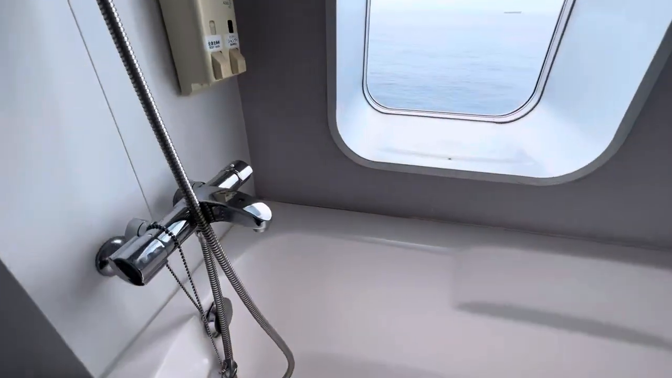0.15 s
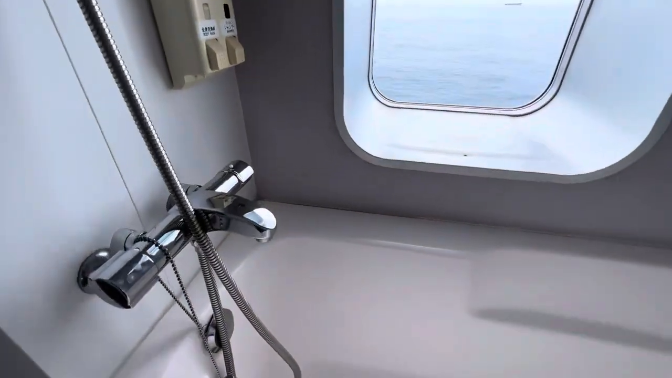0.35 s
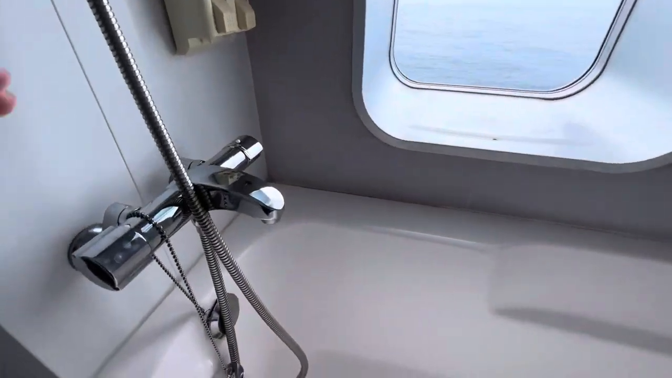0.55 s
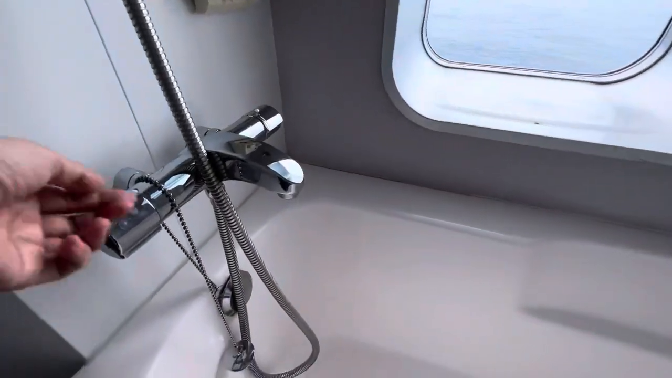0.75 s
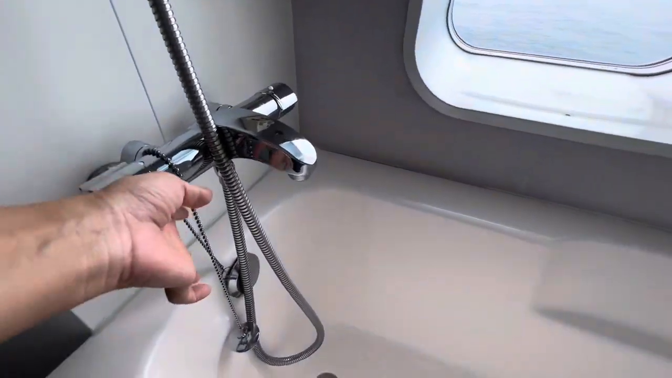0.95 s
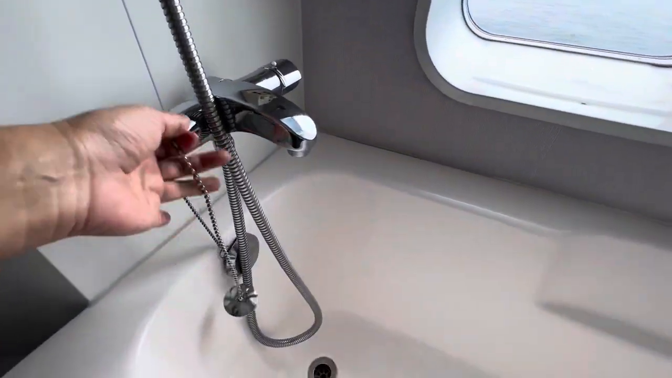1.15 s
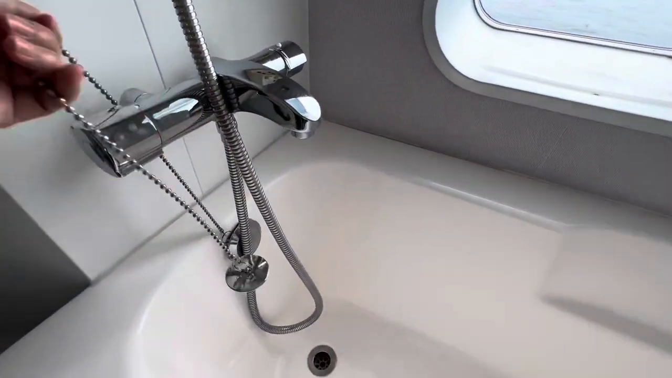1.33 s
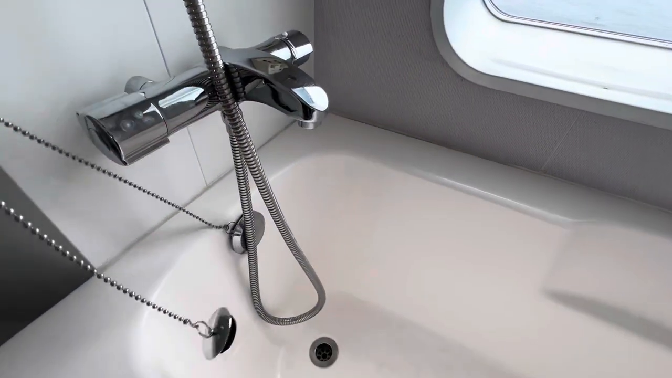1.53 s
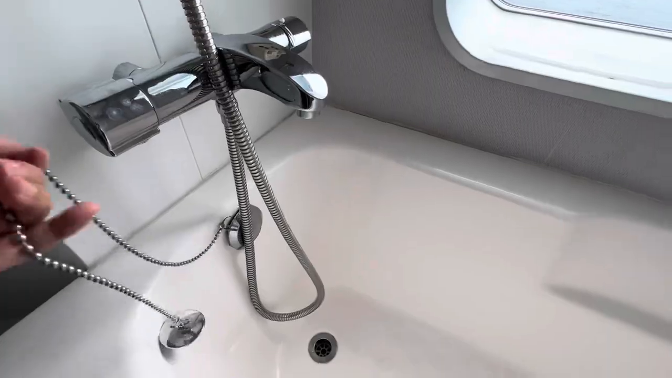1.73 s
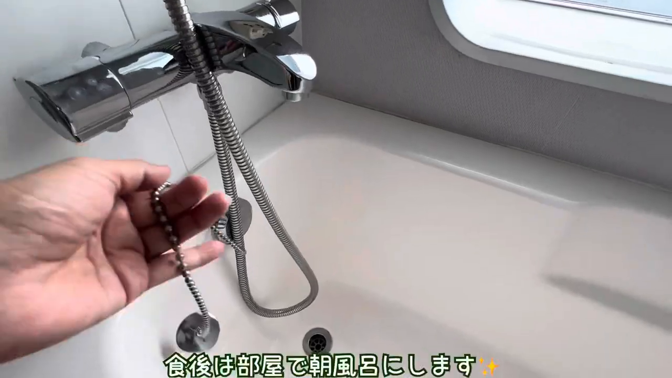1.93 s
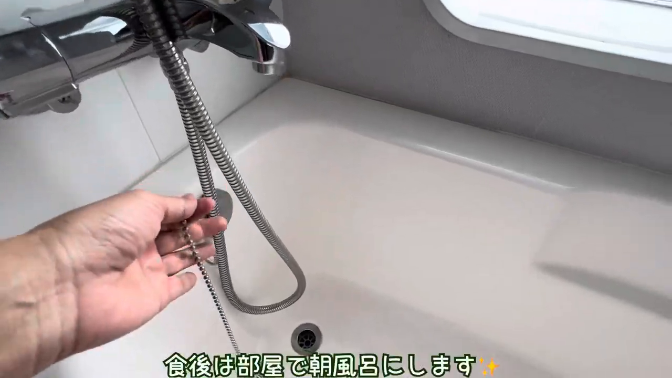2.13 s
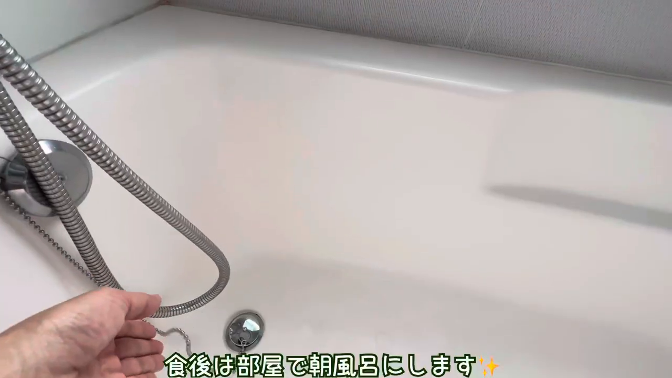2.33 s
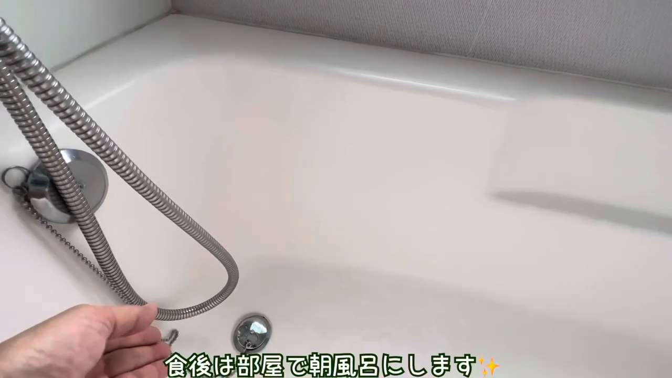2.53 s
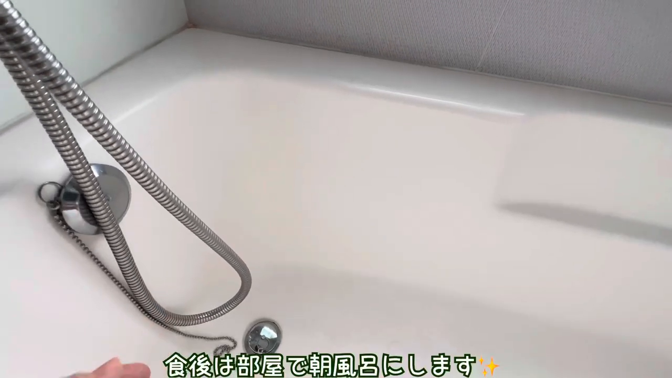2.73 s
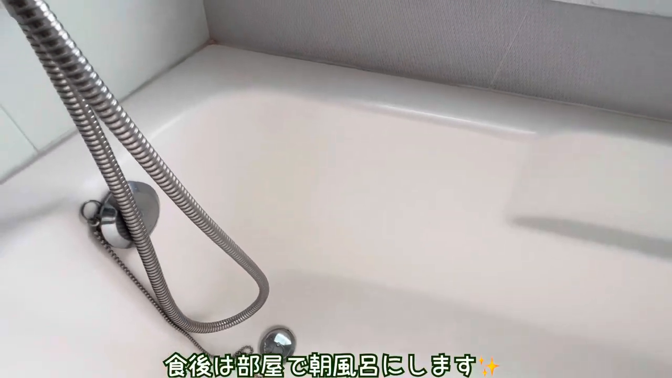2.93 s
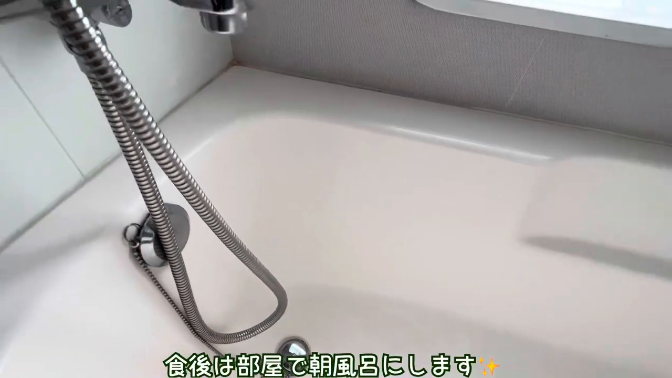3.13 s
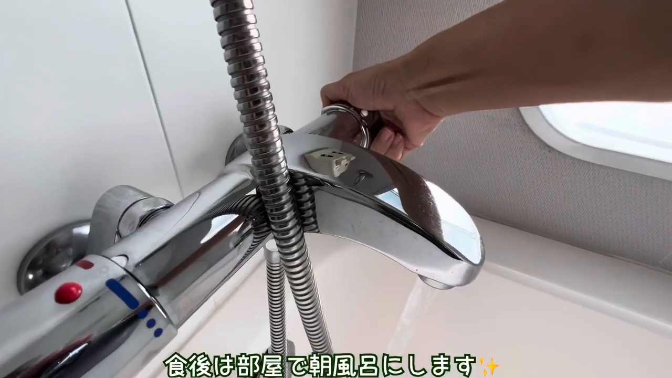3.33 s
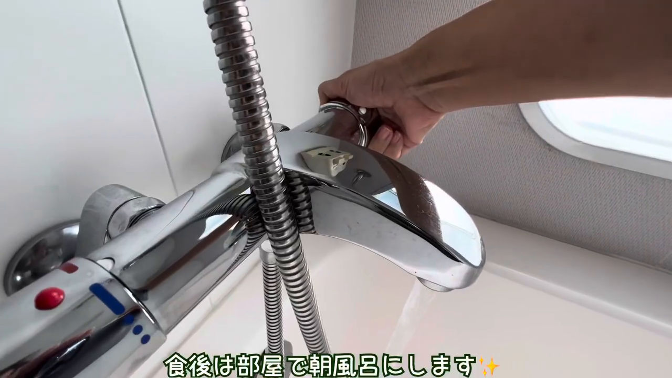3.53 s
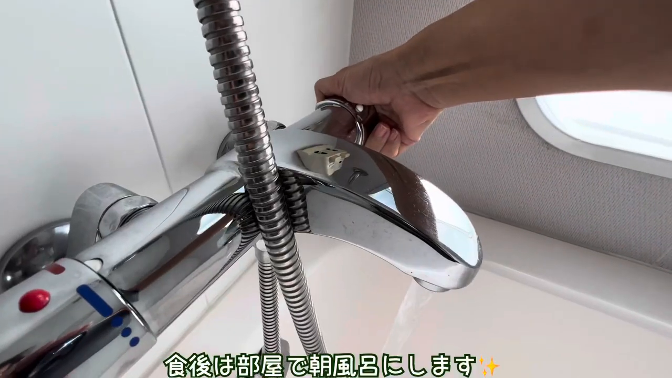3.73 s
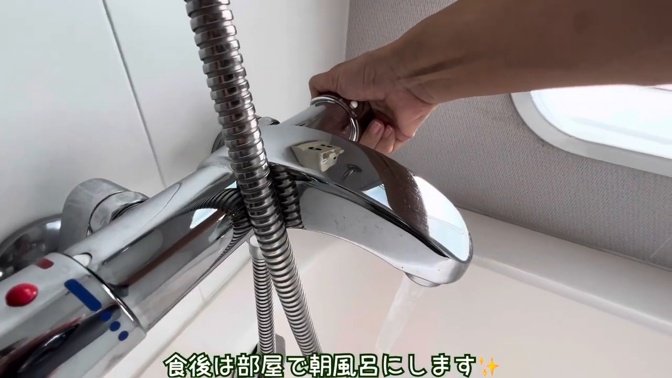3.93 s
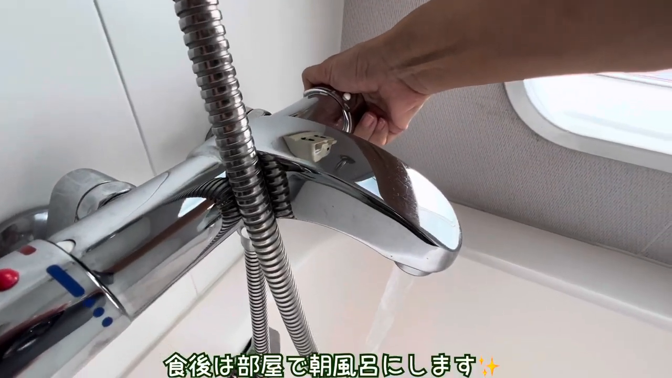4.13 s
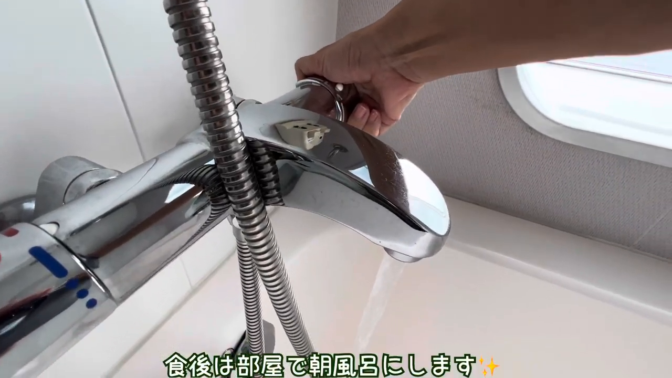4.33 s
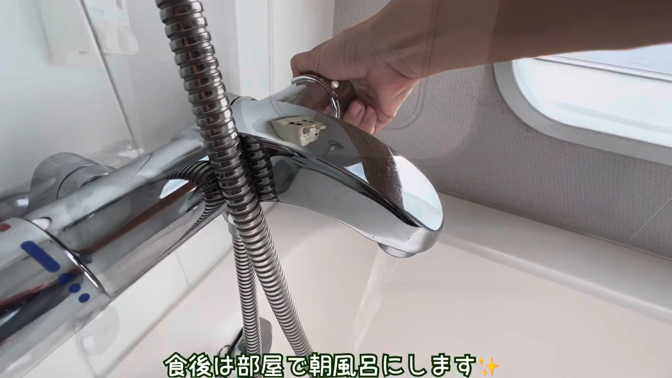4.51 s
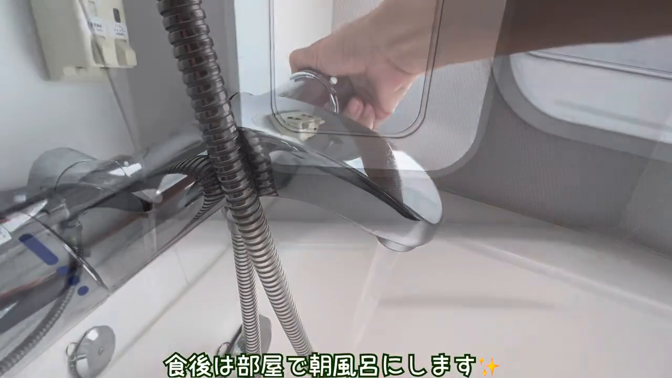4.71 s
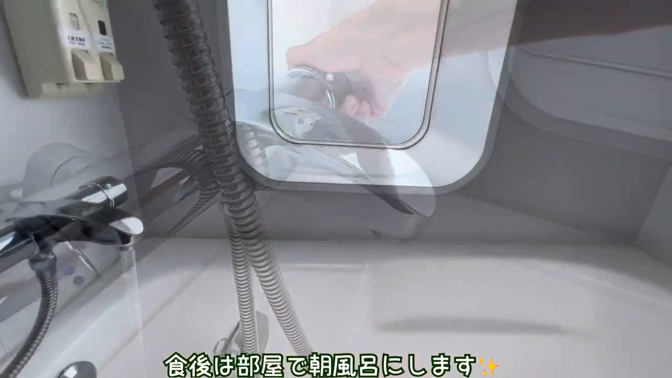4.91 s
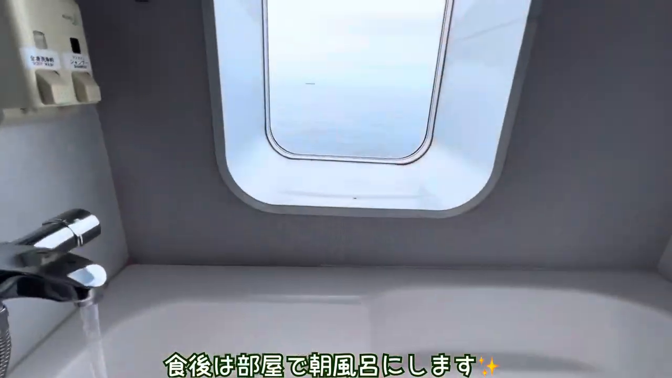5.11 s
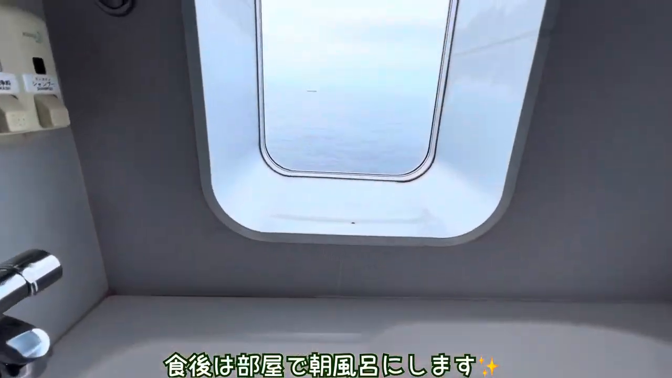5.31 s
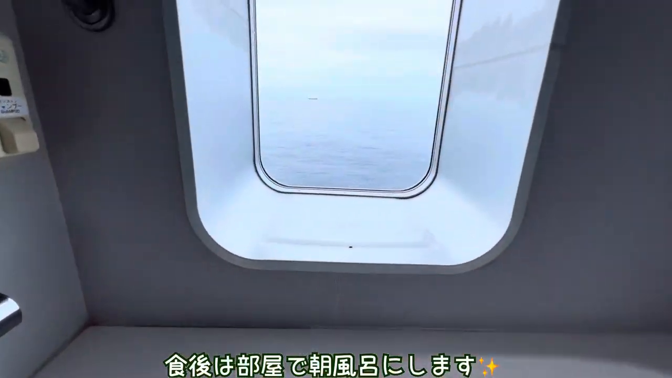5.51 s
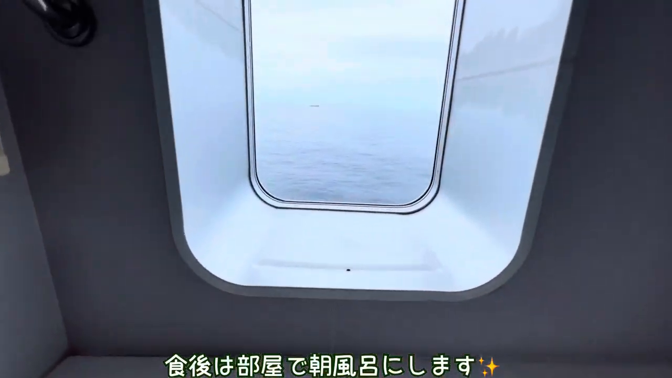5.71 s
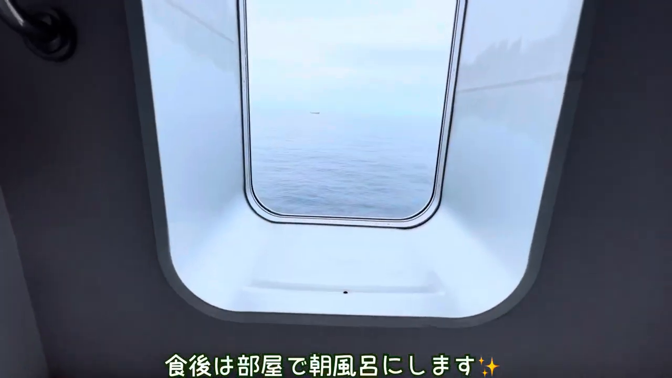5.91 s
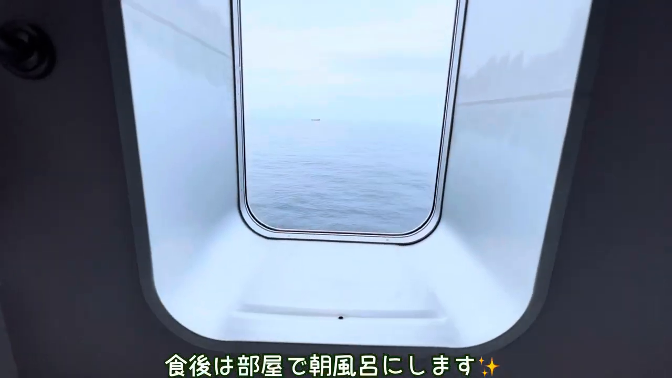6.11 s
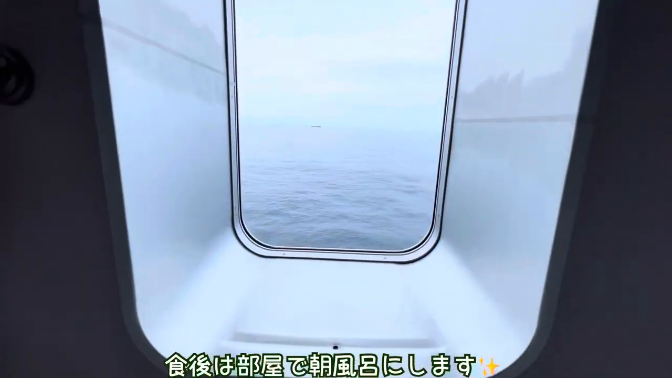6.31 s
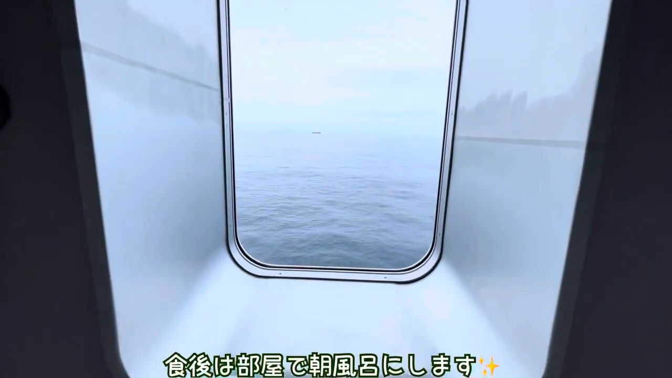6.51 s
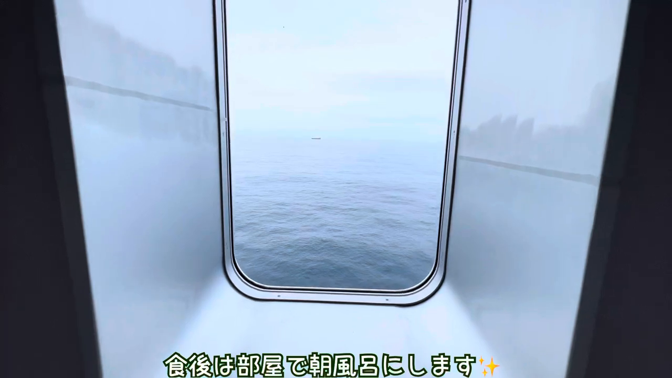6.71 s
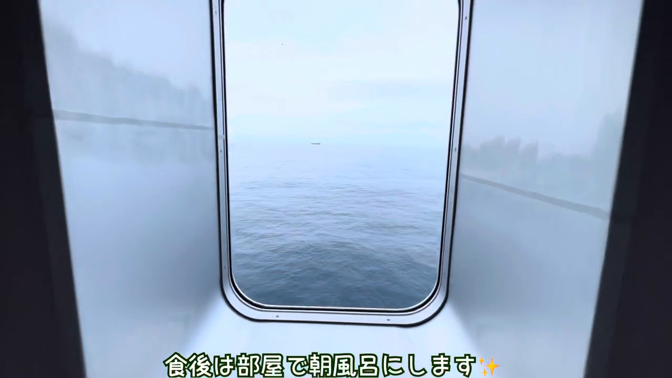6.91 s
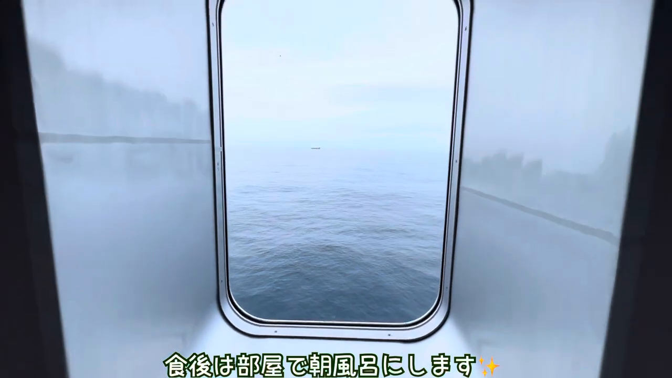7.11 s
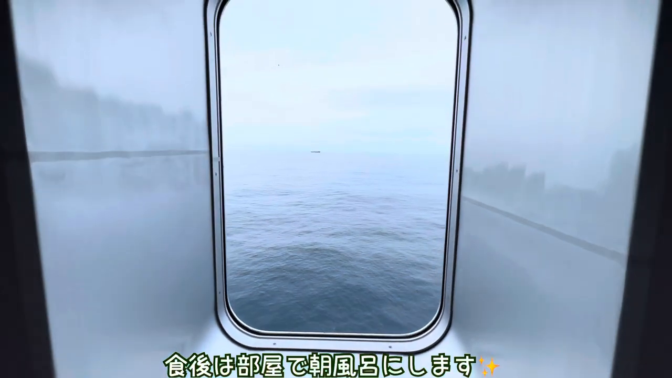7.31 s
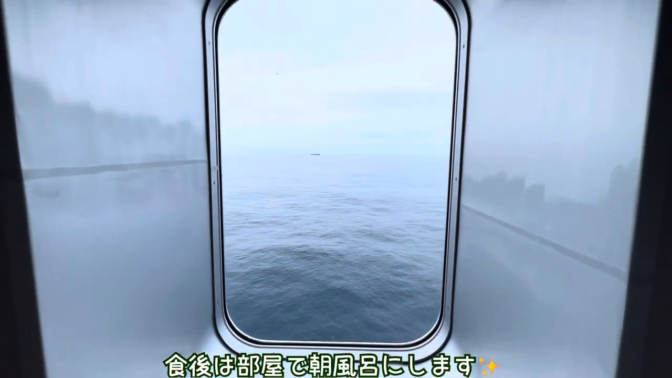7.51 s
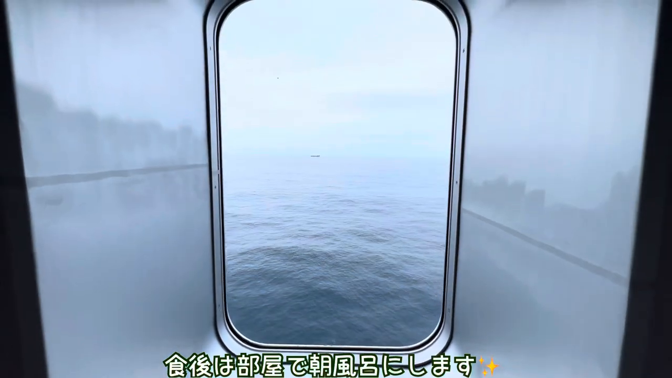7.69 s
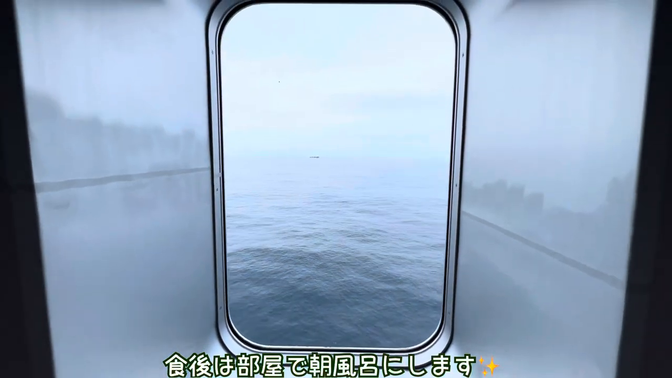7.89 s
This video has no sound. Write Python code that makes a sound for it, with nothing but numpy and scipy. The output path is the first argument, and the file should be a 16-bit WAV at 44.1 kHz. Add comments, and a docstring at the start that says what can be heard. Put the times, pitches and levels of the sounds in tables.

```python
"""A ship's small bathroom, with the engines rumbling and humming through the floor all along.
Sleeve and hand rub faintly; then a plug on a ball chain clinks, pings and knocks against the tub.
It is lowered in: beads tick in runs and loops of chain slap down, ringing the wall and the fittings.
The tap patters thinly, then opens with a gush that splatters in noisy impacts on the bare tub.
Last the jet plunges into gathering water: noisy spray, with clouds of gliding rings for bubbles."""
import sys
import numpy as np
from scipy import signal
from scipy.fft import rfft, irfft
from scipy.io import wavfile

SR = 44100
rng = np.random.default_rng(int(sys.argv[2]) if len(sys.argv) > 2 else 0)


def wav_out(sig):
    """Save sig, one row per channel (or a flat mono array), as 16-bit PCM at SR to the path in sys.argv[1]."""
    wavfile.write(sys.argv[1], SR, np.round(np.clip(np.atleast_2d(sig).T, -1, 1) * 32767).astype(np.int16))


N = 350595
TIME = np.arange(N) / SR
EDGE_HZ = 16100  # top of the audible band
DIRECT_S = 64 / SR  # lead-in of every room response before its direct sound

# Colour of the engine rumble. Each row: frequency in Hz, level in dB per Hz.
RUMBLE_COLOUR = [(12, -44.5), (20, -18), (54, -1), (114, -4.5), (130, -6.5), (222, -19.5), (254, -19.5),
                 (307, -22), (446, -31), (496, -33.5), (703, -41.5), (1400, -49), (2600, -58), (4000, -63),
                 (7000, -60), (12000, -69.5), (15600, -100), (22000, -120)]
# The hum swells and sinks. Each row: time in seconds, level in dB before the trim of each partial.
HUM_SWELL = [(0, -74), (.22, -38), (.58, -40.5), (.72, -56), (1.45, -54), (1.75, -41), (2.75, -43.5),
             (2.92, -32), (3.06, -58), (3.23, -37), (3.67, -46.5), (3.88, -30.5), (4.05, -40.5),
             (4.33, -41.5), (4.48, -29.5), (4.68, -50), (5.35, -64), (5.5, -42), (7.15, -40.5),
             (7.65, -37.5), (7.95, -44.5)]
# The engines' balance at the two ports. Each row: frequency in Hz, left over right in dB.
CENTRED = [(20, 0), (16000, 0)]
# Balance of sounds at the tub, at the tap to the left, and of the jet in the pool when facing the window.
# Each row: frequency in Hz, left over right in dB.
AT_TUB = [(60, 2), (110, -5), (200, 6.5), (380, 2.5), (700, 2.5), (1290, 2.5), (2380, 0), (4400, 7),
          (8120, 4.5), (15000, -3.5)]
AT_TAP = [(60, -1.5), (110, 15), (200, 4), (380, 1.5), (700, 4.5), (1290, 3), (2380, 6), (4400, 13.5),
          (8120, 6.5), (15000, -5)]
AT_WINDOW = [(100, 24), (350, -1), (1100, 3), (2200, -0.5), (4000, 2.5), (5500, 6.5), (6700, 7),
             (8000, 1.5), (9300, -7), (11500, 0)]
# Likeness of the two microphone ports. Each row: frequency in Hz, correlation from -1 to 1.
LIKENESS = [(60, 0.95), (200, 0.83), (330, 0.45), (550, -0.24), (1100, -0.054), (1850, -0.59),
            (2600, -0.094), (4200, -0.011), (8000, 0.028), (10300, -0.46), (11000, 1), (11700, -0.049)]
# Decay of the room's echoes. Each row: frequency in Hz, time to fall 60 dB in seconds.
ROOM_T60 = [(150, 0.51), (500, 0.42), (1500, 0.42), (4000, 0.28), (7000, 0.3), (12000, 0.18)]

# Strokes of the arm reaching for the plug.
# Each row: start in seconds, length in seconds, sleeve hiss in dB, hand scuff in dB.
RUBS = [(.135, 0.043, -70, -67), (.208, 0.08, -78, -54), (.32, .06, -74, -89), (.468, 0.034, -68, -57),
        (.51, 0.082, -83, -68), (.61, 0.038, -78, -87), (1.04, 0.026, -93, -69), (1.16, 0.25, -80, -64)]
# Colours of the sleeve's hiss and the hand's soft scuff. Each row: frequency in Hz, level in dB per Hz.
RUSTLE_COLOUR = [(1000, -22), (3500, -9), (5500, -2.5), (7500, -3), (9500, -6), (12000, -19), (16000, -38)]
SCUFF_COLOUR = [(200, -6.5), (500, 0), (750, -3.5), (1300, -8.5), (2200, -12), (3200, -24), (6000, -34.5),
                (12000, -44.5)]
# Faint, dry ticks. Each row: start in seconds, peak in dB, dull above in Hz.
TICKS = [(.272, -44, 9000), (0.295, -40, 5970), (2.207, -37.5, 2440)]

# Metal clinks of plug and chain. Each row: time in seconds, peak in dB, thin below in Hz, dull above in Hz.
CLINKS = [(1.278, -44, 4970, 9000), (1.297, -33.5, 6150, 16000), (1.321, -35, 697, 4400),
          (1.354, -34.5, 9000, 16000), (1.368, -33, 8050, 16000), (1.429, -33, 600, 8140),
          (1.523, -34, 602, 12000), (1.532, -45.5, 1000, 7940), (1.575, -36, 2000, 8970),
          (1.609, -12, 1510, 15900), (1.84, -45, 5870, 14900), (1.946, -54.5, 3000, 8100),
          (2.027, -59, 3040, 12100), (2.044, -56.5, 3000, 12000)]
# The plug's metal cap pinging. Each row: time in seconds, pitch in Hz, peak in dB, 60 dB decay in seconds.
PINGS = [(1.298, 5650, -35, 0.037), (1.298, 2888, -40, 0.09), (1.368, 2730, -36.5, 0.21),
         (1.368, 5720, -35, 0.037), (1.532, 6200, -41, 0.043), (1.607, 2690, -21.5, .09)]
# Blows of the plug on the tub. Each row: time in seconds, peak in dB, contact in milliseconds,
# thin below in Hz, dull above in Hz, tub ring and cap clank in dB against the blow.
KNOCKS = [(1.609, -10.5, 4.2, 400, 11900, -6, -19), (1.618, -18, 5.7, 302, 2950, -11, -6),
          (1.628, -13, 3.5, 129, 450, -4.5, -24.5), (1.659, -26, 6.4, 450, 1100, -18, -14),
          (1.707, -25.5, 7.9, 754, 3000, -19, 3.5), (1.715, -22, 7.5, 910, 2280, -18, -6),
          (1.737, -27.5, 7.2, 900, 4000, -5, -6), (1.747, -27.5, 6.8, 900, 3000, -15, -8),
          (1.765, -39, 5, 700, 3470, -8, -6), (2.598, -22, 13, 400, 3000, -19, 4),
          (2.619, -40, 7.8, 200, 900, -22, -10), (2.668, -28.5, 6.8, 460, 2500, -27, -10)]
# Colours of clinks and knocks. Each row: frequency in Hz, level in dB per Hz.
CLINK_COLOUR = [(290, -38), (500, -11.5), (545, -21.5), (595, -13), (2500, -8), (2690, -10.5),
                (3540, -13.5), (5800, -11), (13400, -22.5), (16000, -24.5)]
KNOCK_COLOUR = [(88, -39), (150, -15), (235, -11), (361, -19), (730, -18), (1210, -18.5), (1420, -21),
                (2400, -17.5), (3290, -20.5), (7180, -16.5), (10600, -21), (13700, -34), (16000, -54)]
# Modes of the tub's shell, the plug's hollow cap, the tub's side wall, and the air standing in the tub.
# Each row: frequency in Hz, level in dB, 60 dB decay in seconds.
SHELL_MODES = [(216.5, 8, 0.25), (263, -1, 0.41), (307, -2.5, 0.37), (511, 1, 0.39), (594, -8.5, 0.4),
               (722, 0, 0.2)]
CAP_MODES = [(988, -1, 0.15), (1142, 2, 0.16), (1405, -19, .06), (1615, 5, .07), (2148, -4, 0.12),
             (2380, -4.5, .08), (2700, -6.5, .07), (3520, -2, .06)]
WALL_MODES = [(614, 2.5, 0.14), (876, 0, .1), (1279, -3, 0.093), (1388, -5, 0.16), (1748, 1, 0.049),
              (2320, -7, 0.03), (2624, 2.5, 0.042)]
HOLLOW_MODES = [(237, -4, 0.18), (266.5, -3.5, 0.8), (326.8, -2.5, 0.14), (399.7, -6.5, 0.23),
                (432, 0, 0.11), (492, -4.5, 0.45), (727, -12, .12), (894, -11, 0.12)]

# Runs of the bead chain over the tub.
# Each row: start in seconds, length in seconds, bead ticks in dB, drumming of the wall in dB (both before colour).
RUNS = [(2.266, 0.067, -36.5, -57), (2.325, 0.081, -28.5, -32), (2.422, 0.02, -29, -27),
        (2.455, 0.021, -17.5, -29.5), (2.488, 0.028, -16, -56), (2.526, 0.066, -20, -31.5),
        (2.592, 0.0099, -14.5, -24), (2.63, 0.085, -31, -45), (2.77, 0.059, -42, -71),
        (2.825, 0.031, -35, -71), (2.878, 0.043, -34, -57), (2.91, 0.031, -38, -46)]
# Loops of chain slapping down.
# Each row: time in seconds, slap in dB before its trim, thin below in Hz, peak of the wall's ring in dB.
SLAPS = [(2.267, -19, 2000, -43), (2.315, -8, 500, -40), (2.326, -14, 2500, -47), (2.335, -13, 3000, -44),
         (2.345, -8, 300, -41), (2.37, -10, 2500, -35), (2.407, -5, 2000, -42), (2.423, -9, 300, -17.5),
         (2.431, -16, 600, -32), (2.444, -1.5, 3000, -38), (2.451, -6.5, 500, -36), (2.457, -4, 2000, -33),
         (2.491, -3.5, 1000, -42), (2.561, -11, 600, -36), (2.59, -7.5, 300, -36), (2.594, -11, 800, -32),
         (2.602, -10, 505, -20), (2.832, -20, 4520, -43), (2.876, -14, 3520, -52), (2.884, -18, 3500, -55),
         (2.887, -12.5, 3500, -57), (2.912, -23, 1000, -33), (2.929, -30, 1010, -38),
         (3.023, -21.5, 3230, -62)]
# Metal fittings that the chain runs over. Each row: frequency in Hz, level in dB.
FITTINGS = [(1693, -4), (2320, -5), (2620, -3), (3900, -4), (4694, -10), (5003, -18), (5240, -9),
            (5583, -2), (5794, -16), (6042, 0), (6623, 7), (8339, -10)]
# Colours of beads on the tub, and of the wall drumming where chain lies flat on it.
# Each row: frequency in Hz, level in dB per Hz.
BEAD_COLOUR = [(150, -45), (250, -29), (303, 0.5), (436, -26), (586, -14), (788, -11), (1670, -7.5),
               (2400, -4), (3600, 0.5), (8550, 4.5), (12500, -4.5), (13900, -22), (14700, -3.5),
               (16000, -21)]
DRUM_COLOUR = [(300, -10), (580, -5.5), (800, -4.5), (1150, 1.5), (1700, 2), (2400, 1.5), (3300, -2.5),
               (6000, -34), (12000, -44)]

# Colours of the first thin stream, the opening slug of water, and the splatter on the bare tub.
# Each row: frequency in Hz, level in dB per Hz.
DRIBBLE_COLOUR = [(150, 0), (300, -1), (690, -10), (1030, -5), (1430, -16), (1750, -15), (3600, -15.5),
                  (4300, -24), (6100, -14), (9000, -17.5), (10400, -28), (12000, -18), (13800, -40),
                  (15500, -22)]
SPURT_COLOUR = [(100, -7), (230, 2), (380, -6), (700, -7), (1300, -1), (2300, -4), (4000, -13), (7000, -10),
                (11000, -35), (15000, -40)]
SPLATTER_COLOUR = [(110, -19), (180, -2), (234, -1), (267, -12.5), (496, -11.5), (709, -19), (839, -14),
                   (1390, -15.5), (4810, -17), (6260, -11), (10200, -17), (11800, -14.5), (13800, -27.5),
                   (16000, -18)]
# Single hard drops and splashes. Each row: time in seconds, peak in dB, thin below in Hz, dull above in Hz.
DROPS = [(3.472, -23.5, 600, 11900), (4.593, -24, 4740, 6200), (5.1, -30.5, 1200, 4500),
         (5.211, -36, 3000, 5000), (5.455, -23, 1800, 9000), (5.787, -27.5, 1820, 4500),
         (6.129, -27, 1910, 3200), (6.856, -30, 1000, 5000)]
# The stream sputters. Each row: time in seconds, extra level in dB.
SPUTTERS = [(3.82, 1.5), (4.09, 4.6), (4.315, 7.7)]
# Loud bursts of bubbles. Each row: start in seconds, pitch in Hz, peak in dB.
PLINKS = [(3.8, 6060, -31), (3.91, 6300, -34), (3.945, 4330, -35), (4.068, 2770, -34.5), (4.08, 6070, -33),
          (4.096, 2187, -38), (4.13, 3670, -35), (4.144, 6100, -31), (4.217, 4350, -32.5),
          (4.306, 6000, -28), (4.438, 5770, -33), (4.568, 2750, -31), (4.831, 1310, -34),
          (5.191, 1750, -25.5), (5.33, 953, -32.5), (5.578, 3050, -31), (5.66, 4700, -32),
          (6.639, 1420, -30), (7.204, 2340, -29.5), (7.33, 6360, -27), (7.412, 3620, -32),
          (7.491, 4100, -31), (7.683, 3220, -27)]
# Colours of the plunging jet: spray, burble, deep gurgle. Each row: frequency in Hz, level in dB per Hz.
SPRAY_COLOUR = [(290, -38), (500, 5), (604, -13.5), (708, -4.5), (1080, -1), (1950, -9.5), (2770, -3),
                (4400, -1), (8960, 3.5), (10400, -2.5), (12000, 1), (13800, -61), (14900, -2), (16000, -33)]
BURBLE_COLOUR = [(300, -16.5), (480, -1), (600, -5), (730, -2), (1100, -1), (1300, -0.5), (1650, -4.5),
                 (2000, -7), (3000, -5), (6000, -37)]
GURGLE_COLOUR = [(110, -38.5), (180, -10), (232, 3.5), (320, 2.5), (410, -0.5), (550, -23), (900, -33)]
# The jet gulps air. Each row: time in seconds, extra gurgle in dB, extra burble in dB.
GULPS = [(5.06, 4.5, 1), (5.2, 11, -1.5), (5.47, 7, 5.5), (5.58, 7.5, -1.5), (5.78, 7, 1.5), (5.98, 5, 2.5),
         (6.14, 5, 3), (6.3, 5, 1), (6.5, 6.5, 0.5), (6.65, 5, 3.5), (6.87, -3, 2.5), (7.05, 4, 2.5),
         (7.69, 5, 3)]

# The tap: the thin stream starts, then the valve opens; the gush settles to a splatter.
DRIBBLE_S, OPEN_S = 3.176, 3.473
# Water gathers under the jet between POOL_S and POOLED_S; the tub's floor is covered at COVERED_S.
POOL_S, COVERED_S, POOLED_S = 4.43, 4.84, 5.11


def amp(db):
    """Decibels to gain."""
    return 10 ** (np.asarray(db) / 20)


def unit(x):
    """Scales to rms 1."""
    return x / np.sqrt(np.mean(x ** 2) + 1e-20)


def read(points, hz):
    """Reads a curve over frequency on a log-frequency axis."""
    f, value = np.transpose(points)
    return np.interp(np.log(hz + 1), np.log(f + 1), value)


def level(rows):
    """Gain over time from rows of time in seconds, level in dB."""
    return amp(np.interp(TIME, *np.transpose(rows)))


def add(mix, s, sound):
    """Mixes a sound in at time s."""
    start = max(round(s * SR), 0)
    part = mix[..., start:][..., :sound.shape[-1]]
    part += sound[..., :part.shape[-1]]


def wander(per_s, count=24):
    """Slow chance of rms 1, summed from sines turning up to per_s times a second."""
    t = np.arange(0, N / SR + .01, .004)
    rates = per_s * rng.uniform(.1, 1, count)
    drift = sum(np.sin(2 * np.pi * (hz * t + rng.random())) for hz in rates)
    return np.interp(TIME, t, unit(drift))


def surges(per_s, spread_db):
    """A gain that swells and sinks by chance, up to per_s times a second."""
    return unit(amp(spread_db * wander(per_s)))


def held(s, length, attack_s, release_s):
    """An envelope that rises from time s and dies away once its length is over."""
    rise = np.clip((TIME - s) / attack_s, 0, 1)
    return rise * np.exp(-np.clip((TIME - s - length) / release_s, 0, 20))


def strokes(rows, attack_s, release_s):
    """Gains of the two layers that each row (start s, length s, dB, dB) sets sounding."""
    return sum(amp(dbs)[:, None] * held(s, length, attack_s, release_s) for s, length, *dbs in rows)


def swells(rows, width_s):
    """Gains that bulge briefly around each row's time, one for each dB column."""
    return amp(sum(np.outer(dbs, np.exp(-((TIME - s) / width_s) ** 2)) for s, *dbs in rows))


def ports(z, hz, balance):
    """Turns two unrelated spectra into those at the left and right microphone ports."""
    same = np.clip(read(LIKENESS, hz), -.99, .99)
    lean = amp(read(balance, hz) / 2)
    mid = np.sqrt(1 + same) * z[0]
    side = np.sqrt(1 - same) * z[1]
    return np.array([(mid + side) * lean, (mid - side) / lean]) / np.sqrt(lean ** 2 + lean ** -2 + 2 * same)


def bathroom(colour, balance, direct_db, size=32768):
    """Response from one spot in the tub: the direct sound, then dense echoes off the close walls."""
    noise = rng.standard_normal((2, size // 4 * 3))
    hz, t, z = signal.stft(noise, SR, nperseg=256)
    t60 = read(ROOM_T60, hz)[:, None]
    fading = z * np.exp(-np.log(1000) * t / t60) / np.sqrt(t60)
    echoes = signal.istft(fading, SR, nperseg=256)[1]
    echoes /= np.linalg.norm(echoes[0])
    echoes[:, 64] += amp(direct_db) * np.array([1, 0])
    echoes[:, :64] = 0
    # the colour is causal, so attacks stay sharp
    colour_db = np.maximum(read(colour, abs(np.fft.fftfreq(size, 1 / SR))), -70)
    causal = np.exp(np.conj(signal.hilbert(np.log(amp(colour_db)))))[:size // 2 + 1]
    spectra = ports(rfft(echoes, size) * causal, np.fft.rfftfreq(size, 1 / SR), balance)
    response = irfft(spectra)[:, :echoes.shape[1]]
    return response / np.linalg.norm(response.mean(0))


def sounded(drive, response):
    """A source as it reaches both microphone ports."""
    return signal.fftconvolve(drive[None], response, axes=1)[:, :N]


def peaked(sound, db, size=600):
    """Sets the peak level of a hit, taken as three times the rms of its attack."""
    return sound * amp(db) / (3 * np.sqrt(np.mean(sound.mean(0)[:size] ** 2)))


def impacts(per_s, spread_db):
    """Random tiny impacts, mostly small and a few large; rms 1."""
    size = amp(spread_db * np.minimum(rng.exponential(1, N), 5))
    return unit(size * rng.choice([-1, 1], N) * (rng.random(N) < per_s / SR))


def contact(ms, size=8192):
    """A burst of fine collisions dying within milliseconds; energy 1."""
    burst = rng.standard_normal(size) * np.exp(-np.arange(size) / SR / (ms / 1000))
    return burst / np.linalg.norm(burst)


def band(x, thin_hz, dull_hz):
    """Light contacts lack bass, soft ones lack treble."""
    edges = [thin_hz, min(dull_hz, SR / 2.2)]
    return signal.lfilter(*signal.butter(2, edges, "bandpass", fs=SR), x)


def ring(hz, t60, glide=0, size=8192):
    """A dying sine of energy 1; a bubble's pitch glides up as it nears the surface."""
    t = np.arange(size) / SR
    phase = 2 * np.pi * hz * t * (1 + glide * np.minimum(t / t60, 1))
    wave = np.sin(phase) * np.exp(-np.log(1000) * t / t60)
    return wave / np.linalg.norm(wave)


def struck(modes, size=16384):
    """The modes of one object ringing together; energy 1."""
    wave = sum(amp(db) * ring(hz, t60, size=size) for hz, db, t60 in modes)
    return wave / np.linalg.norm(wave)


def resounding(drive, modes, ring_db):
    """A drive together with the modes that it sets ringing; rms 1."""
    ringing = signal.oaconvolve(drive, struck(modes))[:len(drive)]
    return unit(unit(drive) + amp(ring_db) * unit(ringing))


def grains(low_hz, high_hz, per_s, cycles, spread_db, glide=0, clump_db=0, count=16):
    """A cloud of short rings of many pitches: beads striking, or bubbles born, each size in clumps."""
    cloud = np.zeros(N)
    for hz in np.geomspace(low_hz, high_hz, count):
        at = rng.integers(0, N, int(per_s * N / SR / count) + 1)
        size = amp(spread_db * np.minimum(rng.exponential(1, len(at)), 4)) * rng.choice([-1, 1], len(at))
        births = np.bincount(at, size, N) * surges(12, clump_db)
        cloud += np.sqrt(hz) * signal.oaconvolve(births, ring(hz, cycles / hz, glide, size=4096))[:N]
    return unit(cloud)


def engines():
    """Shaped noise rumbles through the hull, growing and heaving; a wavering sine hums with its octave."""
    hz = np.fft.rfftfreq(N, 1 / SR)
    spectra = rfft(rng.standard_normal((2, N))) * amp(read(RUMBLE_COLOUR, hz))
    noise = irfft(ports(spectra, hz, CENTRED), N)
    growth = amp(0.44 * TIME)  # 0.44 dB per second
    rumble = amp(-40.5) * unit(noise * growth * surges(per_s=3.6, spread_db=0.8))
    pitch_hz = 110.4 + 0.84 * wander(per_s=2.8)
    turn = 2 * np.pi * np.cumsum(pitch_hz) / SR
    hum = amp(-2.5) * np.sin(turn) + amp(-20) * np.sin(2 * turn)
    return rumble + level(HUM_SWELL) * np.sqrt(2) * hum


def handling():
    """Faint rubbing of sleeve and hand, as fine impacts, until the hand has hold of the chain."""
    hiss, scuff = strokes(RUBS, attack_s=0.013, release_s=0.015)
    first_clink_s = CLINKS[0][0]
    hiss = hiss + amp(-82) * (TIME < first_clink_s)  # the sleeve is never quite still
    sleeve = hiss * sounded(impacts(3000, 2.4), bathroom(RUSTLE_COLOUR, AT_TUB, direct_db=-7.0))
    hand = sounded(scuff * impacts(2500, 1.6), bathroom(SCUFF_COLOUR, AT_TUB, direct_db=-0.5))
    return sleeve + hand


def dry_ticks():
    """Small, dull ticks: lowpassed impulses with no room around them."""
    out = np.zeros((2, N))
    for s, db, dull_hz in TICKS:
        click = signal.lfilter(*signal.butter(4, dull_hz, fs=SR), signal.unit_impulse(256))
        add(out, s, amp(db) * click / click.max())
    return out


def plug():
    """The plug clinks and pings on its chain; hard blows make its cap clank and the tub's shell boom."""
    out = np.zeros((2, N))
    metal = bathroom(CLINK_COLOUR, AT_TUB, direct_db=-13)
    for s, db, thin_hz, dull_hz in CLINKS:
        clink = band(contact(ms=1.0), thin_hz, dull_hz)
        add(out, s - DIRECT_S, peaked(sounded(clink, metal), db))
    close = bathroom(CLINK_COLOUR, AT_TUB, direct_db=10)
    for s, hz, db, t60 in PINGS:
        add(out, s - DIRECT_S, peaked(sounded(ring(hz, t60), close), db))
    t = np.arange(SR // 2) / SR
    shell = sum(amp(db) * np.sin(2 * np.pi * hz * t) * np.exp(-np.log(1000) * t / t60)
                for hz, db, t60 in SHELL_MODES)
    shell *= 1 - np.exp(-t / 0.0079)  # the panels take a moment to get moving
    clank = sounded(struck(CAP_MODES), bathroom(KNOCK_COLOUR, AT_TUB, direct_db=13.0))
    for s, db, ms, thin_hz, dull_hz, ring_db, clank_db in KNOCKS:
        blow = band(contact(ms), thin_hz, dull_hz)
        blow = sounded(blow, bathroom(KNOCK_COLOUR, AT_TUB, direct_db=-2.5))
        add(out, s - DIRECT_S, peaked(blow, db))
        add(out, s - DIRECT_S, peaked(clank, db + clank_db))
        add(out, s, amp(db + ring_db - 11.5) * shell)  # -11.5 dB trims the summed modes
    return out


def tripping():
    """One tick for each bead that slips over the rim, at an uneven pace; rms 1."""
    rate_per_s = 95 * np.exp(0.32 * wander(per_s=30))
    beads = np.floor(np.cumsum(rate_per_s) / SR)
    ticks = np.diff(beads, prepend=0) * amp(2.6 * rng.standard_normal(N))
    decay = np.exp(-1 / (0.0012 * SR))
    return unit(signal.lfilter([1], [1, -decay], ticks) * rng.standard_normal(N))


def chain(count=2):
    """Beads tick in many pitches and trip over the rim; loops slap down; wall and fittings ring along."""
    spots = [bathroom(BEAD_COLOUR, AT_TUB, direct_db=-2.0) for _ in range(count)]
    fittings = sum(amp(db) * ring(hz, t60=0.22) for hz, db in FITTINGS)
    ticking, drumming = strokes(RUNS, attack_s=0.0034, release_s=0.0062)
    grit = resounding(impacts(700, 2.6), WALL_MODES, ring_db=-13)
    out = sounded(drumming * grit, bathroom(DRUM_COLOUR, AT_TUB, direct_db=-2.0))
    trips = ticking * amp(-5) * tripping()
    out += sounded(trips, bathroom(BEAD_COLOUR, AT_TUB, direct_db=-9.0))
    for spot in spots:
        beads = grains(1000, 11000, per_s=600, cycles=20, spread_db=3.2, clump_db=3.5, count=20)
        ticks = unit(impacts(450, 3.2) + amp(1) * beads)
        ringing = unit(signal.oaconvolve(ticks, fittings)[:N])
        ticks = ticking * unit(ticks + amp(-15.0) * ringing)
        out += amp(-8.5) * sounded(ticks, spot)
    wall = sounded(struck(WALL_MODES), bathroom(DRUM_COLOUR, AT_TUB, direct_db=4))
    for s, db, thin_hz, wall_db in SLAPS:  # each loop lands on a spot of its own
        near = bathroom(BEAD_COLOUR, AT_TUB, direct_db=-2.0)
        slap = band(contact(ms=2.8), thin_hz, EDGE_HZ)
        add(out, s - DIRECT_S, peaked(sounded(slap, near), db - 8.0))
        add(out, s - DIRECT_S, peaked(wall, wall_db))
    return out


def opening():
    """A thin stream patters on the tub; then the valve opens and a slug of water slaps it and it booms."""
    swell = amp(-49 + 16 * (np.minimum(TIME, OPEN_S) - DRIBBLE_S))  # rises 16 dB per second
    stream = swell * held(DRIBBLE_S, OPEN_S - DRIBBLE_S, attack_s=0.0031, release_s=0.051)
    out = stream * sounded(impacts(2800, 2.6), bathroom(DRIBBLE_COLOUR, AT_TAP, direct_db=-4))
    slug = resounding(contact(ms=16), WALL_MODES, ring_db=-15)
    slug = sounded(slug, bathroom(SPURT_COLOUR, AT_TUB, direct_db=6))
    add(out, OPEN_S - DIRECT_S, peaked(slug, -16))
    add(out, OPEN_S + 0.0065, amp(-44.5) * unit(struck(SHELL_MODES)))
    return out


def drops():
    """Single hard drops, as short noise contacts, crack on the bare tub and later splash into the pool."""
    out = np.zeros((2, N))
    for s, db, thin_hz, dull_hz in DROPS:
        balance = AT_TAP if s < COVERED_S else AT_WINDOW
        spot = bathroom(SPLATTER_COLOUR, balance, direct_db=-0.5)
        drop = band(contact(ms=1.9), thin_hz, dull_hz)
        add(out, s - DIRECT_S, peaked(sounded(drop, spot), db))
    return out


def burst(hz, count=7, length_s=0.024, scatter=0.089):
    """A drop traps a handful of bubbles of like size, the first ones loudest; energy 1."""
    out = np.zeros(SR // 4)
    for k, (late, pitch) in enumerate(rng.uniform(-0.99, 1, (count, 2))):
        own_hz = hz * (1 + scatter * pitch)
        bubble = ring(own_hz, t60=45 / own_hz, glide=0.015)
        add(out, length_s * (k + late / 2) / count, amp(-5 * k / count) * bubble)
    return out / np.linalg.norm(out)


def splatter(count=3):
    """The stream gushes, settles and wobbles, breaks into drops on the bare tub and traps high bubbles."""
    out = np.zeros((2, N))
    gush_db = 29 * np.exp(-np.maximum(TIME - OPEN_S, 0) / 0.048)
    # dies away once the tub's floor is covered
    flow = amp(-44) * held(OPEN_S, COVERED_S - OPEN_S, attack_s=0.025, release_s=0.2)
    sputter = swells(SPUTTERS, width_s=0.035)[0] * surges(per_s=25, spread_db=1.7)
    for _ in range(count):
        bubbles = grains(1720, 8600, per_s=160, cycles=22, spread_db=4, glide=.07, clump_db=3, count=9)
        spatter = band(sputter * (impacts(500, 3.0) + amp(-14.0) * bubbles), 1550, EDGE_HZ)
        # the core of the stream drums evenly and takes only a share of the gush
        core = amp(1.5 + 0.32 * gush_db) * band(impacts(2500, 3.9), 90, 1230)
        drive = flow * (amp(gush_db) * spatter + core)
        out += sounded(drive, bathroom(SPLATTER_COLOUR, AT_TAP, direct_db=-3.0))
    spot = bathroom(SPLATTER_COLOUR, AT_TAP, direct_db=2.0)
    for s, hz, db in PLINKS:
        add(out, s, peaked(sounded(burst(hz), spot), db))
    return out


def pooling(full_db, shallow_db, db_per_s):
    """Gain of one sound of the jet: it grows as water gathers, then drifts as the pool deepens."""
    depth = np.clip((TIME - POOL_S) / (POOLED_S - POOL_S), 0, 1)
    drift_db = db_per_s * np.maximum(TIME - POOLED_S, 0)
    return np.minimum(depth / 0.35, 1) * amp(full_db - shallow_db * (1 - depth) + drift_db)


def filling(count=5, size=3):
    """The jet gulps air under: fine spray, burbling bubbles, and big ones gurgling in the tub's hollow."""
    churn = surges(per_s=14, spread_db=.65) * surges(per_s=90, spread_db=.8)
    deep_gulp, light_gulp = swells(GULPS, width_s=0.062)
    spray, burble, gurgle = np.zeros((3, 2, N))
    fizz = grains(1500, 9000, per_s=130, cycles=22, spread_db=3.8, glide=.08, clump_db=1.8, count=24)
    for k in range(count):  # the spray lands on several spots
        drive = impacts(600, 3.3) + amp(-7.0) * np.roll(fizz, k * N // count)
        spray += sounded(churn * drive, bathroom(SPRAY_COLOUR, AT_WINDOW, direct_db=-9))
    small = grains(950, 3200, per_s=80, cycles=26, spread_db=3.2, glide=.12, clump_db=2, count=22)
    middling = grains(420, 950, per_s=70, cycles=20, spread_db=2.4, glide=.14, clump_db=1)
    big = grains(195, 480, per_s=90, cycles=11, spread_db=1.8, glide=.1, clump_db=.6)
    light = resounding(small + amp(-2.5) * middling, HOLLOW_MODES, ring_db=-10)
    deep = resounding(big, HOLLOW_MODES, ring_db=0.5)
    deep_gulp = deep_gulp * surges(per_s=22, spread_db=2)
    for k in range(size):  # bubbles rise in several places around the jet
        shift = k * N // size
        light_room = bathroom(BURBLE_COLOUR, AT_WINDOW, direct_db=-6.5)
        burble += sounded(light_gulp * np.roll(light, shift), light_room)
        deep_room = bathroom(GURGLE_COLOUR, AT_WINDOW, direct_db=2.5)
        gurgle += sounded(deep_gulp * np.roll(deep, shift), deep_room)
    spray *= pooling(full_db=-32.5, shallow_db=18.4, db_per_s=-0.1) / spray.mean(0).std()
    burble *= pooling(full_db=-39, shallow_db=14.7, db_per_s=-0.046) / burble.mean(0).std()
    gurgle *= pooling(full_db=-39.5, shallow_db=17, db_per_s=-0.7) / gurgle.mean(0).std()
    return spray + burble + gurgle


def scene():
    """Everything in the little room, over the engines."""
    before_water = engines() + handling() + dry_ticks() + plug() + chain()
    return before_water + opening() + drops() + splatter() + filling()


def record(dry):
    """The recorder rounds off the very loudest peaks, then limits the band."""
    ceiling = .93
    rounded = dry / (1 + (dry / ceiling) ** 6) ** (1 / 6)
    lowpass = signal.firwin(511, EDGE_HZ, window=("kaiser", 9), fs=SR)
    return signal.oaconvolve(rounded, lowpass[None], "same")


dry = scene()
out = record(dry)
wav_out(out)
```